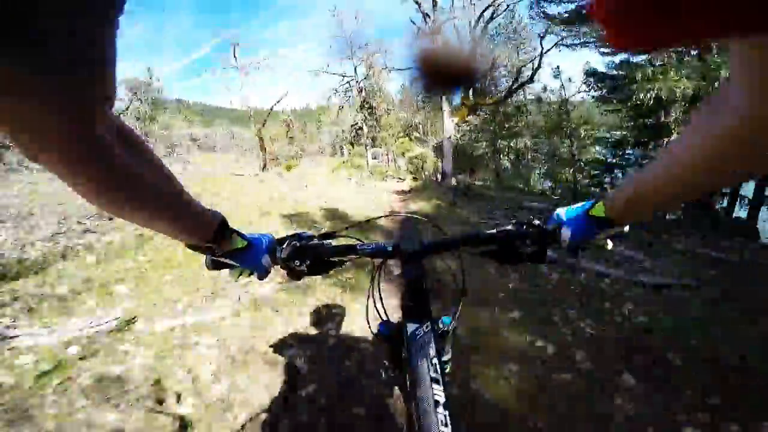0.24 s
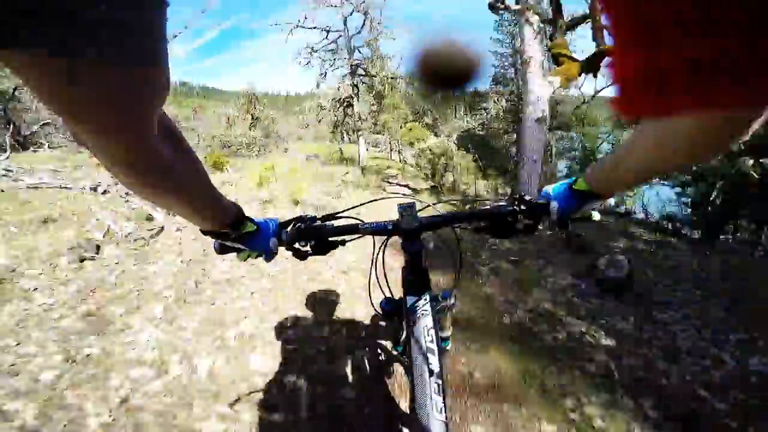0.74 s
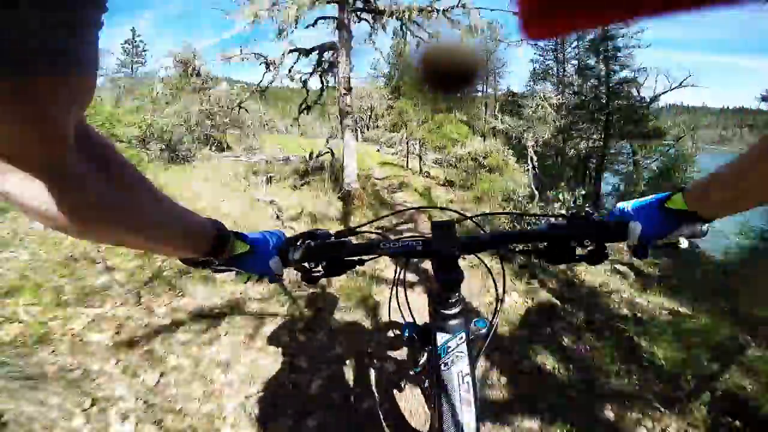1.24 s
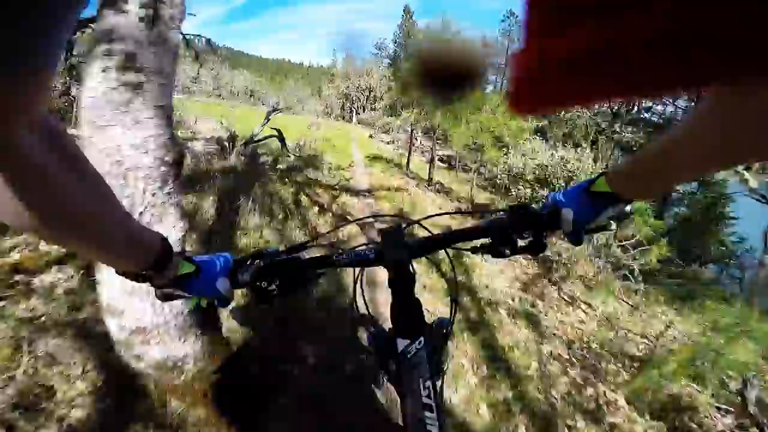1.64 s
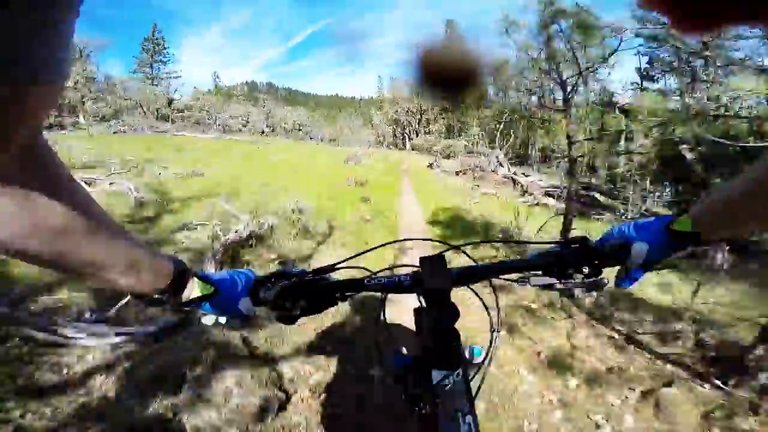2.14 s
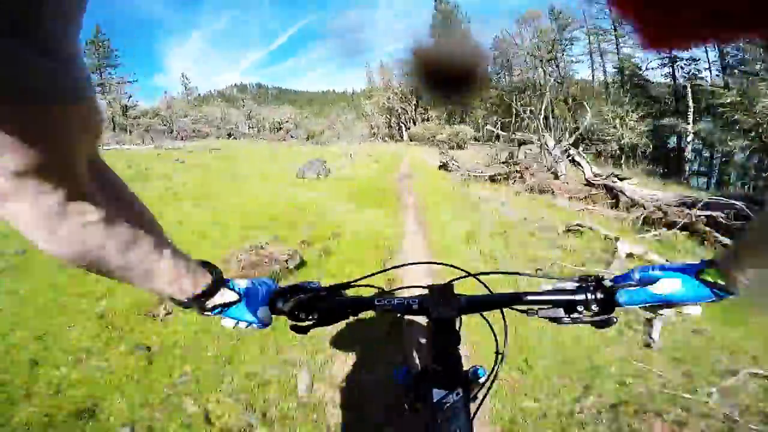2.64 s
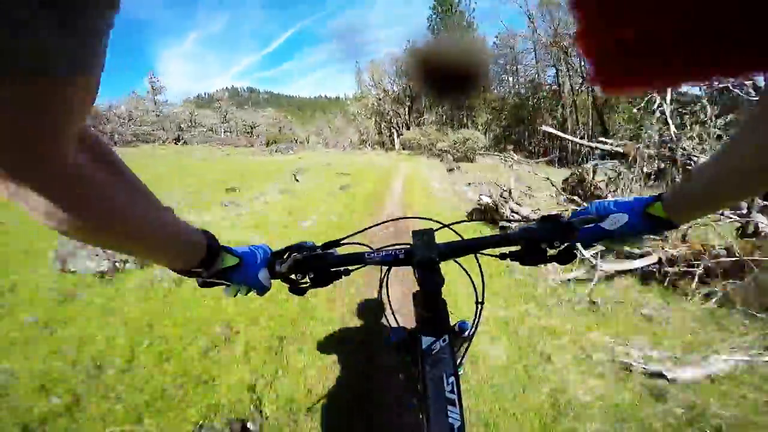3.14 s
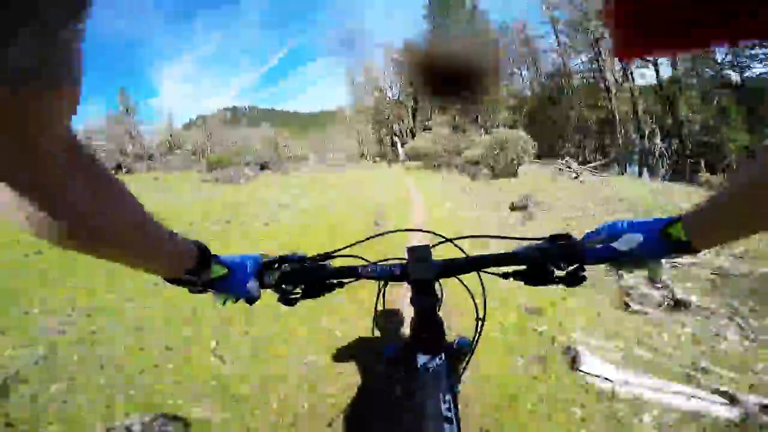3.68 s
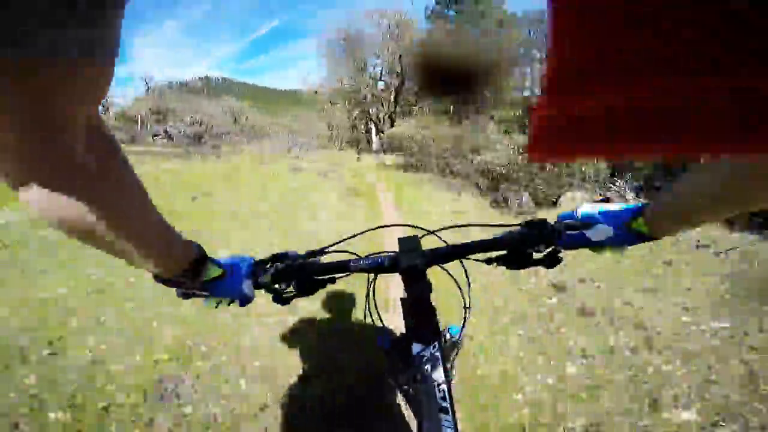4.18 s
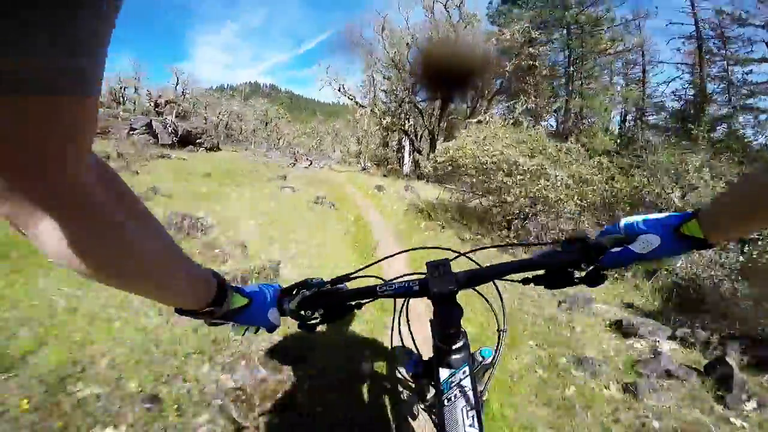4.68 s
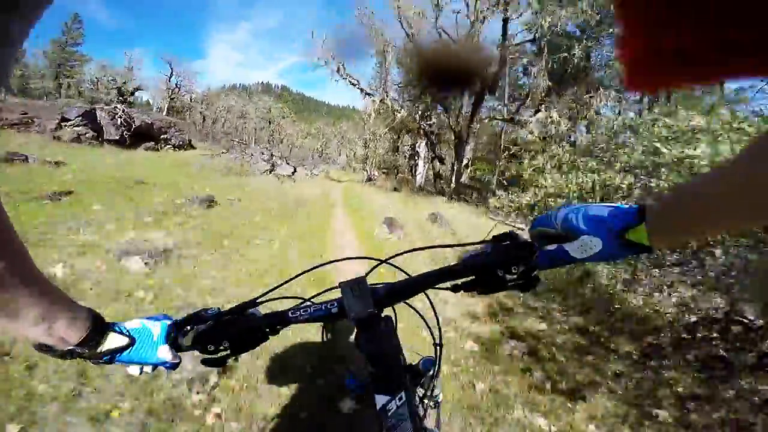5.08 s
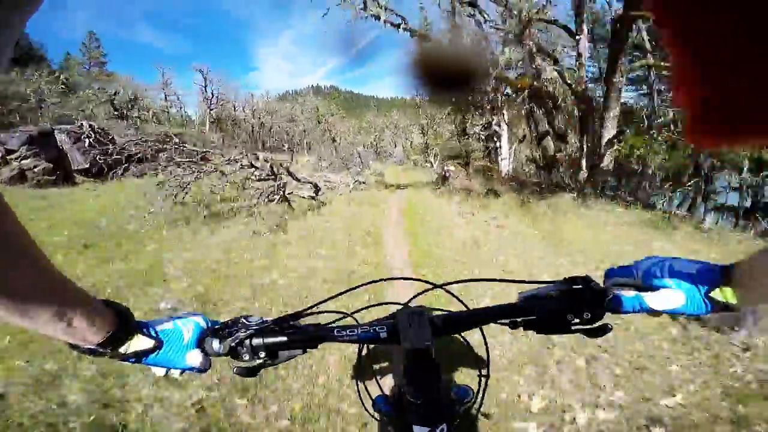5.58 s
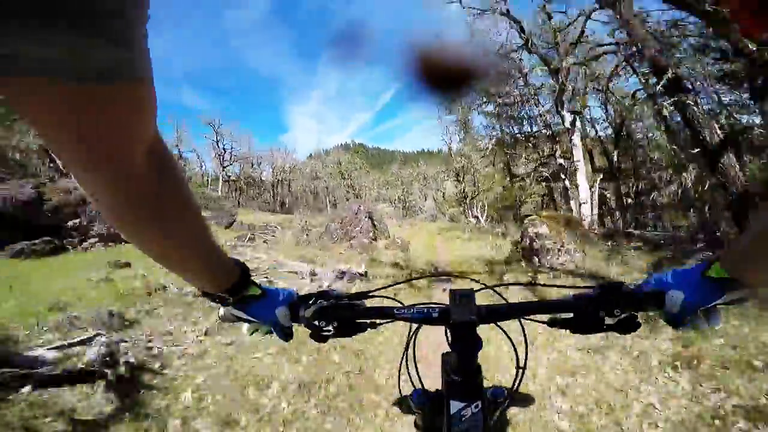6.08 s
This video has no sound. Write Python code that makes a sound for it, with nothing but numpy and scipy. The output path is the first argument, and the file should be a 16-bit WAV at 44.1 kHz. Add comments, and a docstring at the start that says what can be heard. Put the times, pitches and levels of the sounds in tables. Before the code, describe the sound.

A mountain bike rolls along a dry woodland trail, heard from a small camera in a plastic housing worn on the chest. Tyre roar, gritty hiss and leaf crackle run throughout. Hard plastic clacks strike early, some with a brief metallic ring, and cluster between two and three seconds. Wind and bumps rumble low against the microphone. Afterwards the knocks become sparse and the ground sounds softer and thinner.

```python
"""A mountain bike rolls along a dry woodland trail, heard by a small camera in a plastic housing on the chest.
From the start tread roar, grit hiss and leaf crackle (filtered noise with cracks) pass narrow bands of the
housing and of treble whine, over electronic hiss and whine; gusts (slow noise) and jolts (short low swings)
rumble. Mount knocks (decaying sines) come at once, harder from 0.57 s, where a metal part first rings (two
swelling tones), and crowd together from 2 to 3 s; then knocks grow sparser, airflow weaker and litter thinner,
with two late rings near 6 s."""
import sys
import numpy as np
from scipy import signal
from scipy.fft import rfft, irfft
from scipy.io import wavfile
from scipy.ndimage import uniform_filter1d

SR = 44100
rng = np.random.default_rng(int(sys.argv[2]) if len(sys.argv) > 2 else 0)


def amplitude_ratio(level_db):
    """Convert a level in decibels to the matching linear amplitude (field) ratio."""
    exponent = np.asarray(level_db, float) / 20
    return 10 ** exponent


def output_pcm(signal):
    """Save a mono or channel-first signal as 16-bit PCM at the path in sys.argv[1].

    Samples are clipped to [-1, 1] before scaling.
    """
    pcm = np.clip(np.atleast_2d(signal).T, -1, 1) * 32767
    wavfile.write(sys.argv[1], SR, np.round(pcm).astype(np.int16))


N = 278712
TIME = np.arange(N) / SR  # seconds

# All levels apply at the source, ahead of the narrow bands and of the saturation in record(). # Steady hiss of
# the microphone. Each row: frequency in Hz, spectral level in dB.
SELF_NOISE_SPECTRUM = [(4800, -12.5), (8000, 3), (15200, -8), (15500, -45)]

# Low rumble of the wind. Each row: frequency in Hz, spectral level in dB.
RUMBLE_SPECTRUM = [(14, 10), (28, -1.5), (45, -12)]
# Flutter of quicker eddies. Each row: frequency in Hz, spectral level in dB.
FLUTTER_SPECTRUM = [(45, 4.5), (70, -4), (105, -5.5), (150, -13.5)]
# Steady airflow under the gusts. Each row: time in seconds, rumble level in dB.
AIRFLOW = [(0, -37), (1.2, -28.5), (2.3, -34), (3.2, -39), (6.32, -43)]
# Gusts added to the airflow. Each row: centre in seconds, peak level in dB, half length in seconds.
GUSTS = [(0.0, -24, 0.013), (0.173, -29, 0.048), (0.458, -24.5, 0.083), (0.887, -34, 0.2),
         (1.138, -16, 0.037), (1.278, -22, 0.067), (1.676, -26, 0.13), (1.909, -19, 0.025),
         (2.097, -27, 0.044), (2.49, -31.5, 0.032), (2.822, -16, 0.085), (3.254, -39.5, 0.042),
         (3.59, -33.5, 0.034), (3.75, -41, 0.055), (4.006, -35.5, 0.022), (4.138, -25.5, 0.032),
         (4.36, -31.5, 0.045), (4.577, -37.5, 0.028), (4.84, -29, 0.13), (5.181, -29, 0.06),
         (5.63, -37.5, 0.071), (6.025, -32, 0.038), (6.335, -29.5, 0.086)]

# Bumps that jolt the whole camera. Each row: centre in seconds, level in dB, pitch in Hz.
JOLTS = [(0.125, -20.5, 53.7), (0.349, -21, 56), (0.507, -20.5, 63), (0.896, -18, 58.7), (1.296, -27, 53),
         (1.668, -20, 65), (2.055, -33, 64), (2.437, -31, 53.3), (2.732, -17, 68), (2.851, -17, 75),
         (2.985, -23.5, 58), (3.217, -26.5, 63), (3.584, -24.5, 50), (3.996, -26.5, 68), (4.385, -34, 80),
         (4.471, -30, 73.6), (4.78, -22, 76), (5.168, -27, 59), (5.559, -37, 78.5), (5.951, -29, 79)]

# Tones of the metal part in Hz, lower and upper.
RING_HZ = (1806, 2654)
# Growth and decay, one row per tone. Each row: time to fade by 60 dB in seconds, build-up in seconds.
RING_TIMES = [(0.17, 0.017), (0.12, 0.0028)]
# Hard knocks that excite it. Each row: start in seconds, lower tone in dB, upper tone in dB.
RINGS = [(0.57, -35, -47), (0.815, -35, -35.5), (1.022, -42, -42), (1.14, -36.5, -45), (2.288, -46, -34),
         (2.423, -49, -39), (2.734, -41, -34.5), (2.874, -45, -35), (3.532, -47, -41), (5.89, -50, -60),
         (6.187, -48, -52)]

# Knocks of the mount and their bounces.
# Each row: start in seconds, clack in dB, clack pitch in Hz, dull part in dB, bright snap in dB.
KNOCKS = [(0.0323, -22, 2190, -19, -26.5), (0.0346, -12, 2190, -15, -25.5), (0.0422, -18, 1890, -20, -49),
          (0.5683, -0.5, 2015, -2, -15), (0.573, -13, 1890, -25, -36), (0.577, -16, 2190, -19, -34),
          (0.817, -3, 1990, -3, -32), (0.8196, -5.5, 2280, -28, -36), (0.8233, -10, 2220, -14.5, -42),
          (0.8925, -12, 1930, -12, -27.5), (1.0201, -15.5, 2000, -11, -27), (1.024, -8, 2010, -19.5, -24),
          (1.139, 4.5, 2285, -7, -28), (1.1436, 0, 2400, -10.5, -41), (2.0057, -18, 2630, -15, -27.5),
          (2.2862, 0.5, 2580, -10.5, -27), (2.2905, -9, 2490, -18, -46), (2.4253, -9.5, 1760, -16, -20.5),
          (2.4302, -15, 3600, -14, -26), (2.569, -16, 2550, -14.5, -22.5), (2.7272, -4.5, 2160, -10, -29),
          (2.7313, -14, 2260, -14, -37), (2.7362, -5.5, 2310, -15, -34), (2.8599, -7, 2320, -7, -22),
          (2.8653, -11, 2080, -12, -27), (2.8758, -4.5, 2820, -10, -18.5), (2.8824, -16, 2380, -28, -45),
          (3.532, -7, 2180, -14, -56), (4.114, -26, 2520, -36, -41), (4.4934, -17, 1900, -17, -40),
          (5.1412, -26, 2200, -31, -53), (5.8293, -13, 3140, -30, -51), (5.8888, -9, 2260, -12.5, -53),
          (5.8915, -15.5, 1940, -39, -55), (6.187, -8.5, 2160, -11.5, -39)]
# Soft thuds of the housing, almost without clack. Each row: start in seconds, dull part in dB, its pitch in Hz.
THUDS = [(0.6558, -12, 914), (1.6779, -23, 816), (1.9511, -18, 890), (2.8598, -9, 600),
         (2.8645, -16.5, 627), (2.9282, -8.5, 1130), (2.9787, -6.5, 980), (4.08, -25.5, 880),
         (5.0358, -24.5, 850), (5.208, -15, 915)]
# Light ticks, nearly all clack. Each row: start in seconds, clack in dB, clack pitch in Hz.
TICKS = [(0.5823, -18, 1860), (0.99, -21, 3540), (1.1342, -24, 3780), (1.181, -20, 3820),
         (1.7565, -17, 3600), (2.0142, -18, 2540), (2.0181, -20.5, 2220), (2.1572, -22, 1670),
         (2.169, -19, 3760), (2.8947, -15, 2620), (2.915, -15, 2240), (2.9152, -17, 3630),
         (4.1167, -23, 2240), (4.1646, -16.5, 2200), (4.168, -21, 2300), (4.594, -24.5, 2270),
         (4.764, -26, 1710), (5.06, -24, 3850), (5.229, -22, 3700), (5.5198, -16, 3340),
         (5.7238, -16, 3220), (5.7335, -21.5, 3360), (5.7476, -23, 3520), (5.7883, -21, 3180),
         (5.9661, -23, 2200), (6.2126, -21, 3150)]
# Modes of a clack. Each row: multiple of the pitch, relative level in dB, cycles to fade by 60 dB.
CLACK_MODES = [(1, 0, 18), (1.24, -9, 20), (.8, -10, 14), (1.7, -16, 20)]
# Modes of a dull part. Each row: multiple of the pitch, relative level in dB, cycles to fade by 60 dB.
DULL_MODES = [(.3, -2.5, 6), (.55, -8.5, 12.5), (.8, 5, 9), (1.1, 11.5, 10.5), (1.35, -6.5, 26)]
# Modes of a snap. Each row: frequency in Hz before mount() scales it, relative level in dB,
# cycles to fade by 60 dB.
SNAP_MODES = [(6000, -1, 36), (7200, -10, 43), (10320, 0, 22), (13500, -4, 30)]

# Ground under the tyres. Each row: time in seconds, grit hiss in dB.
GRIT_HISS = [(0.0, -45), (0.5, -43), (0.75, -48.5), (1.18, -42), (1.64, -45.5), (1.8, -42), (2.2, -43),
             (2.32, -41.5), (2.89, -41.5), (3.02, -44), (3.29, -43), (3.38, -52.5), (3.47, -43.5),
             (4.05, -49), (4.42, -43.5), (4.48, -48), (4.76, -39.5), (4.85, -51), (5.24, -51), (5.43, -54),
             (5.54, -46.5), (6.0, -42.5), (6.12, -47), (6.32, -46.5)]
# Dry litter, thick under the trees and thin on the grass.
# Each row: time in seconds, crackle relative to the usual hiss in dB.
LITTER = [(0, -16.5), (0.9, -19), (1.5, -13.5), (2.1, -19.5), (3.3, -21.5), (5.3, -21.5), (6.32, -24)]
# Leaves and stalks crushed close by. Each row: centre in seconds, treble level in dB.
CRUSHES = [(0.022, -58), (0.048, -54), (0.29, -50), (0.312, -52), (0.586, -61), (0.78, -54), (1.308, -55),
           (1.635, -49), (1.88, -52), (1.918, -61), (2.502, -56), (2.643, -47), (2.691, -52), (2.845, -53),
           (2.895, -45), (2.915, -58), (2.968, -56), (3.069, -45), (4.595, -54), (4.736, -44),
           (4.756, -46.5), (5.523, -50)]
# Tread roar. Each row: frequency in Hz, spectral level in dB.
ROAR_SPECTRUM = [(170, 5.5), (250, 3), (330, 3.5), (530, -3), (800, -3.5), (965, 0), (1100, -3.5),
                 (1450, -10.5)]
# Grit hiss. Each row: frequency in Hz, spectral level in dB.
HISS_SPECTRUM = [(1400, -6.5), (1950, -2), (2250, 2), (3160, -1), (3880, 0), (4560, -6.5), (5000, -20.5)]
# Leaf crackle. Each row: frequency in Hz, spectral level in dB.
LEAF_SPECTRUM = [(5000, 1.5), (6100, 6.5), (8300, -8.5), (12300, -7), (15200, -13), (15500, -44)]
# Close crushes. Each row: frequency in Hz, spectral level in dB.
CRUSH_SPECTRUM = [(5000, 6), (7500, -2.5), (12000, -3), (15000, -10), (16200, -40)]
# Narrow bands: resonances of the closed housing, and thin whine lines of the electronics in the treble. Each
# row: centre in Hz, width in Hz, boost in dB.
NARROW_BANDS = [(1702, 64, 7), (2277, 36, 5), (2530, 33, -4.5), (3190, 130, 2), (3950, 110, 3.5),
                (4180, 113, -8.5), (6500, 300, -4.5), (7260, 200, 6.5), (9740, 400, 5.5),
                (12600, 300, 4)]


def unit(x):
    """Normalisation: scales a signal to an rms of 1."""
    return x / np.sqrt(np.mean(x ** 2))


def curve(table):
    """Linear interpolation: the second column of a table at every sample."""
    seconds, values = np.transpose(table)
    return np.interp(TIME, seconds, values)


def smooth_twice(x, length):
    """Moving average, applied twice, over a length in samples."""
    return uniform_filter1d(uniform_filter1d(x, length), length)


def bell(time, centre, half_length):
    """Gaussian envelope: peak 1, falling to 1/e a half length from the centre."""
    return np.exp(-((time - centre) / half_length) ** 2)


def fade_60_db(time, duration):
    """Exponential decay: falls by 60 dB in the duration."""
    return np.exp(-np.log(1000) * time / duration)


def onset(time, build_up):
    """Gradual excitation: rises smoothly from 0 towards 1."""
    return 1 - np.exp(-(time / build_up) ** 2)


def colour(x, spectrum):
    """Linear filtering: weights the spectrum by the table, falling 30 dB per octave more outside it."""
    hz, db = np.transpose(spectrum)
    f = np.maximum(np.fft.rfftfreq(len(x), 1 / SR), 1)
    octaves_below = np.maximum(np.log2(hz[0] / f), 0)
    octaves_above = np.maximum(np.log2(f / hz[-1]), 0)
    gain_db = np.interp(np.log(f), np.log(hz), db) - 30 * (octaves_below + octaves_above)
    return irfft(rfft(x) * amplitude_ratio(gain_db), len(x))


def walk(rate):
    """Slow random modulation: values held for 1 / rate seconds, smoothed twice and scaled to rms 1."""
    hold = int(SR / rate)
    steps = np.repeat(rng.standard_normal(N // hold + 1), hold)
    return unit(smooth_twice(steps, hold)[:N])


def grains(per_s, spread_db):
    """Impulse noise: scattered one-sample cracks of either sign, a few much larger than the rest."""
    struck = rng.random(N) < per_s / SR
    size_db = -spread_db * np.log(1 - rng.random(N))
    sign = np.sign(rng.random(N) - 0.5)
    return unit(struck * amplitude_ratio(size_db) * sign)


def modes(table, t, scale=1.0, scatter=0.0):
    """Modal superposition: decaying sines, peak 1; plastic damps each within a set number of cycles."""
    ratio, db, cycles = np.transpose(table)[:, :, None]
    turns = ratio * scale * (1 + scatter) * t
    y = np.sum(amplitude_ratio(db) * fade_60_db(turns, cycles) * np.sin(2 * np.pi * turns), axis=0)
    return y / np.abs(y).max()


def electronics():
    """Circuit noise: the microphone's even hiss with two thin whines wavering in level and phase."""
    whine = 0
    for hz, db in ((12618, -88), (6320, -86)):
        level = amplitude_ratio(db + 2 * walk(20))
        whine = whine + level * np.sin(2 * np.pi * hz * TIME + walk(20))
    hiss = unit(colour(rng.standard_normal(N), SELF_NOISE_SPECTRUM))
    return whine + amplitude_ratio(-74) * hiss


def wind():
    """Turbulent pressure: gusts set the size of slow swings, whose own chance swelling is partly evened out."""
    flow = amplitude_ratio(curve(AIRFLOW)) + sum(amplitude_ratio(db) * bell(TIME, s, half_s) for s, db, half_s in GUSTS)
    gust_db = 20 * np.log10(flow)
    flutter_db = -40 + 0.21 * (gust_db + 31)  # the eddies follow a share of the gusts
    out = 0
    for spectrum, hold_s, level_db in ((RUMBLE_SPECTRUM, 0.09, gust_db), (FLUTTER_SPECTRUM, 0.2, flutter_db)):
        x = colour(rng.standard_normal(N), spectrum)
        swell = np.sqrt(smooth_twice(x ** 2, int(hold_s * SR)))
        out = out + amplitude_ratio(level_db) * unit(x / swell ** 0.7)
    return out


def jolts():
    """Damped oscillation: the harness swings once or twice at each bump, in random phase."""
    out = np.zeros(N)
    for s, db, hz in JOLTS:
        cycles = hz * (TIME - s)
        swing = np.cos(2 * np.pi * (cycles + rng.random()))
        out += amplitude_ratio(db) * bell(cycles, 0, 0.6) * swing
    return out


def metal_part():
    """Coupled resonance: two tones fed through the mount swell after the knock before they die."""
    out, t = np.zeros(N + SR), TIME[:SR // 2]
    for hz, (t60, build_up), levels_db in zip(RING_HZ, RING_TIMES, np.transpose(RINGS)[1:]):
        swell = onset(t, build_up) * fade_60_db(t, t60)
        tone = swell / swell.max() * np.sin(2 * np.pi * hz * t)
        for (s, *_), db in zip(RINGS, levels_db):
            start = int(s * SR)
            out[start:start + len(t)] += amplitude_ratio(db) * tone
    return out[:N]


def blows():
    """Common impact form: start s, clack dB, clack Hz, dull dB, dull Hz, snap dB of knocks, thuds and ticks."""
    usual_dull_hz = 980
    knocks = [(s, db, hz, dull_db, usual_dull_hz, snap_db) for s, db, hz, dull_db, snap_db in KNOCKS]
    thuds = [(s, db - 9.5, 1714, db, hz, db - 39) for s, db, hz in THUDS]
    ticks = [(s, db, hz, db - 19, usual_dull_hz, db - 32) for s, db, hz in TICKS]
    return knocks + thuds + ticks


def mount():
    """Impact excitation: each blow sounds clack, dull and snap modes and a short noisy rattle of the shell."""
    out, t = np.zeros(N + SR), TIME[:SR // 20]
    shell = signal.butter(2, [700, 3800], "bandpass", fs=SR, output="sos")
    for s, clack_db, clack_hz, dull_db, dull_hz, snap_db in blows():
        # no two blows land on the same spot, so the modes scatter in pitch
        dull_scatter = 0.035 * rng.standard_normal((len(DULL_MODES), 1))
        snap_scatter = 0.035 * rng.standard_normal((len(SNAP_MODES), 1))
        # plastic contact takes a moment: build-up times in seconds
        clack = amplitude_ratio(clack_db) * onset(t, 0.00033) * modes(CLACK_MODES, t, clack_hz)
        dull = amplitude_ratio(dull_db) * onset(t, 0.00039) * modes(DULL_MODES, t, dull_hz, dull_scatter)
        snap = amplitude_ratio(snap_db) * onset(t, 0.0001) * modes(SNAP_MODES, t, 0.89, snap_scatter)
        rattle_level = amplitude_ratio(clack_db - 15.5) + amplitude_ratio(dull_db - 18)
        rattle_envelope = onset(t, 0.0024) * fade_60_db(t, 0.019)
        rattle = rattle_level * rattle_envelope * signal.sosfilt(shell, rng.standard_normal(len(t)))
        start = int(s * SR)
        out[start:start + len(t)] -= clack + dull + snap + rattle
    return out[:N]


def rough_noise(per_s):
    """Granular friction: steady noise with scattered cracks."""
    return 0.75 * grains(per_s, 2.8) + rng.standard_normal(N)


def tyres():
    """Rolling contact: tread roar, hiss with grit, dry leaves crackling in bunches, and close crushes."""
    usual_hiss_db = -44
    hiss_db = curve(GRIT_HISS)
    swing_db = hiss_db - usual_hiss_db
    # the ground softens towards the meadow: the roar loses 0.7 dB per second
    roar_db = -48.5 + 0.44 * swing_db - 0.7 * (TIME - TIME[-1] / 2)
    leaf_db = usual_hiss_db + curve(LITTER) + 0.49 * swing_db
    ground_db = 1.3 * walk(70)  # small rough patches lift roar, hiss and leaves together
    roar = amplitude_ratio(roar_db + ground_db + 1.54 * walk(25)) * unit(colour(rough_noise(200), ROAR_SPECTRUM))
    hiss = amplitude_ratio(hiss_db + ground_db + 1.3 * walk(110)) * unit(colour(rough_noise(500), HISS_SPECTRUM))
    litter = rough_noise(300)
    leaves = amplitude_ratio(leaf_db + ground_db + 1.7 * walk(70)) * unit(colour(litter, LEAF_SPECTRUM))
    crush_level = sum(amplitude_ratio(db) * bell(TIME, s, 0.0019) for s, db in CRUSHES)
    crushes = crush_level * unit(colour(litter, CRUSH_SPECTRUM))
    return roar + hiss + leaves + crushes


def narrow_bands(x):
    """Resonance: the shell and thin treble whine of the electronics boost or cut narrow bands, with a small
    loss throughout."""
    f = np.fft.rfftfreq(N, 1 / SR)
    gain_db = sum(db / (1 + (2 * (f - hz) / width) ** 2) - 0.4 for hz, width, db in NARROW_BANDS)
    return irfft(rfft(x) * amplitude_ratio(gain_db), N)


def scene():
    """Superposition at one microphone; the narrow bands colour the tyres and the electronics."""
    coloured = narrow_bands(electronics() + tyres())
    return (wind() + jolts() + coloured + metal_part() + mount())[None]


def low_pass(x):
    """Removes everything above the highest recorded frequency."""
    return signal.sosfilt(signal.butter(12, 16470, fs=SR, output="sos"), x)


def record(dry):
    """Saturation: a hyperbolic tangent rounds the loudest peaks."""
    mix = np.tanh(0.55 * dry) / 0.31
    return low_pass(mix)


dry = scene()
out = record(dry)
output_pcm(out)
```